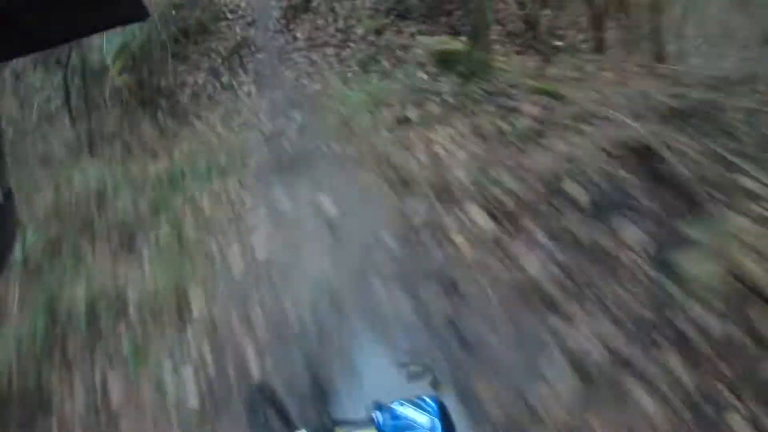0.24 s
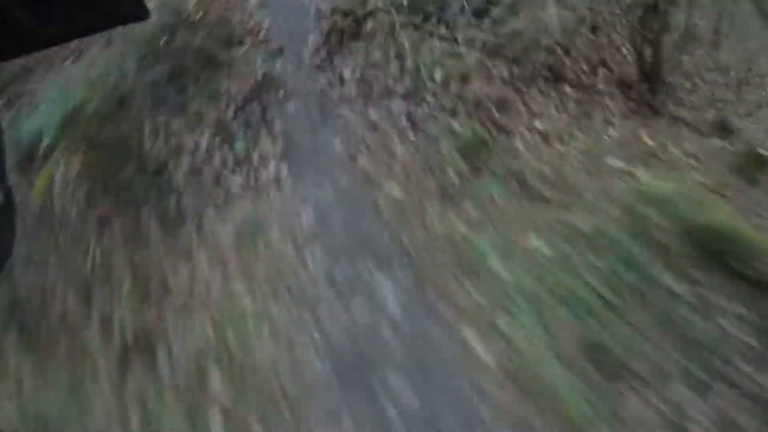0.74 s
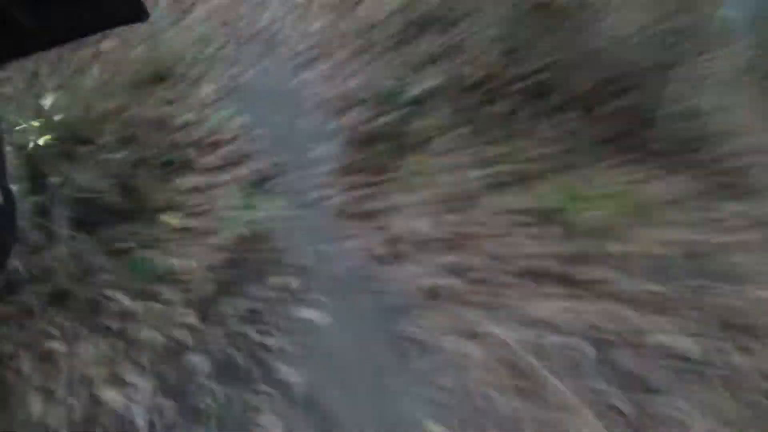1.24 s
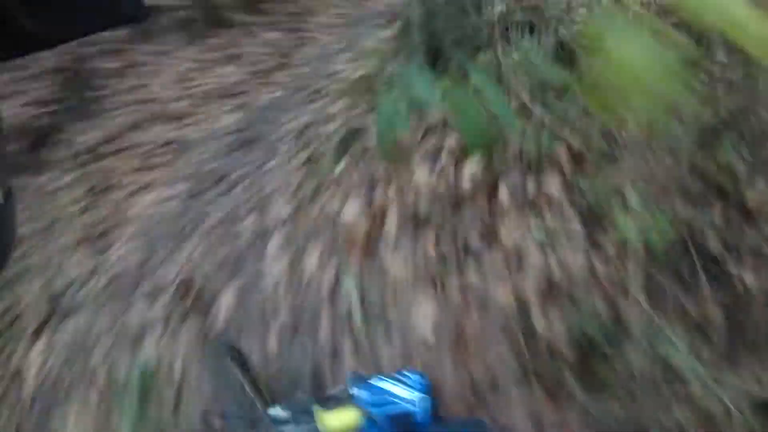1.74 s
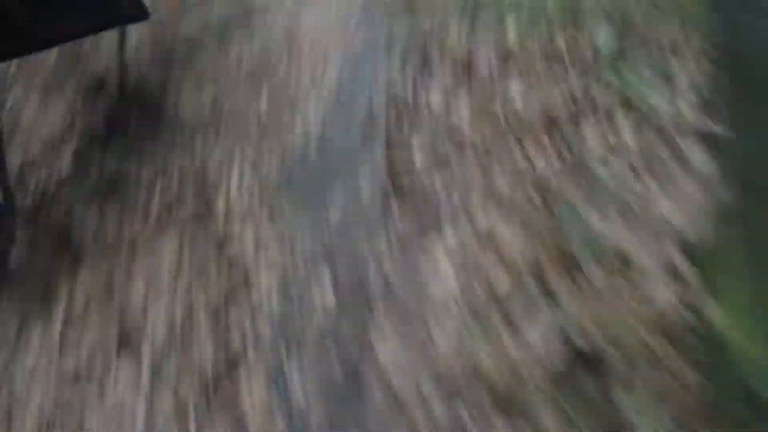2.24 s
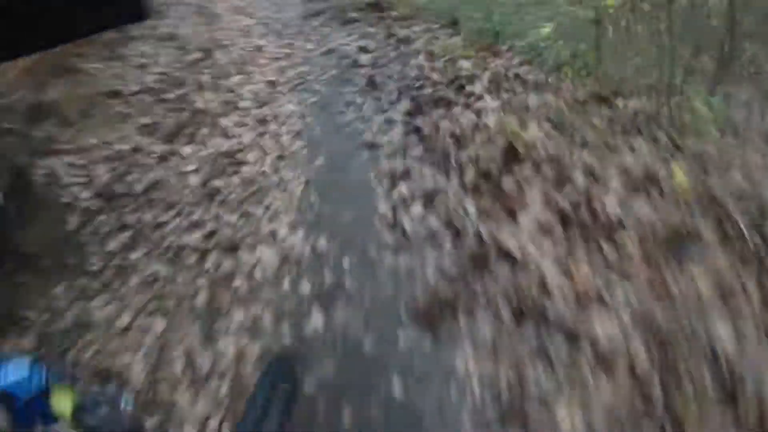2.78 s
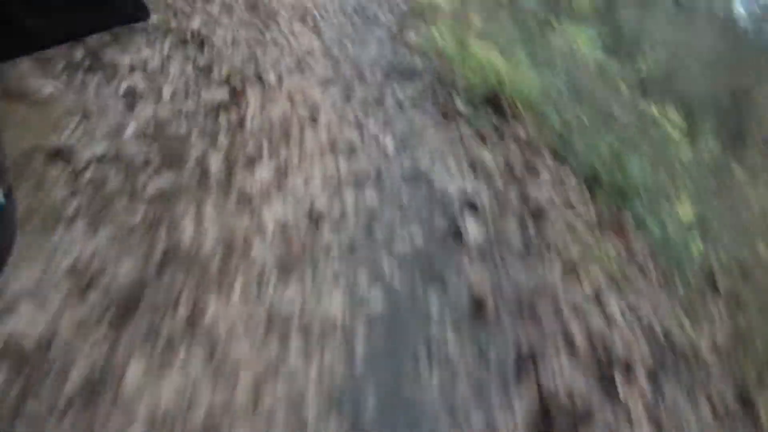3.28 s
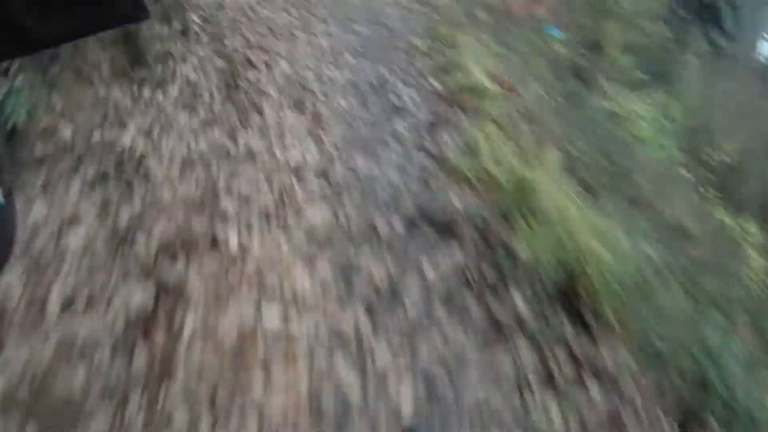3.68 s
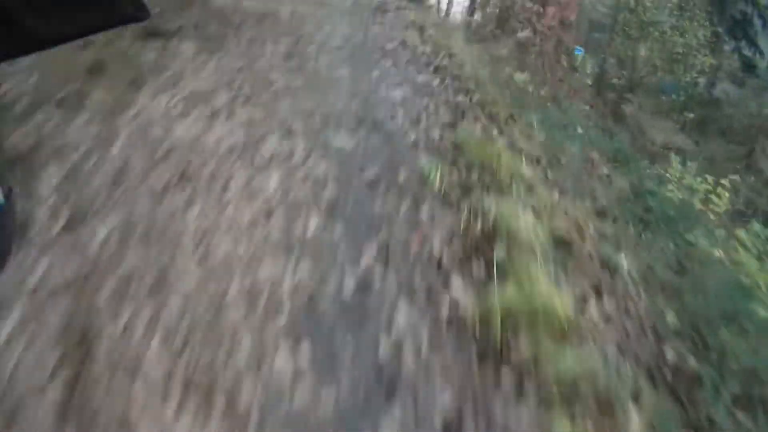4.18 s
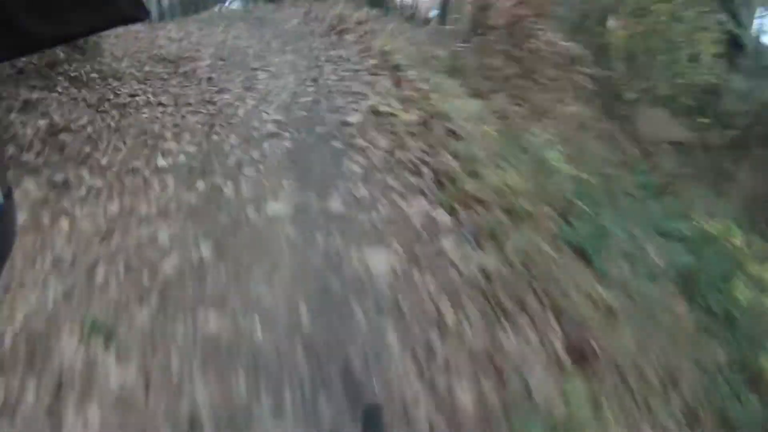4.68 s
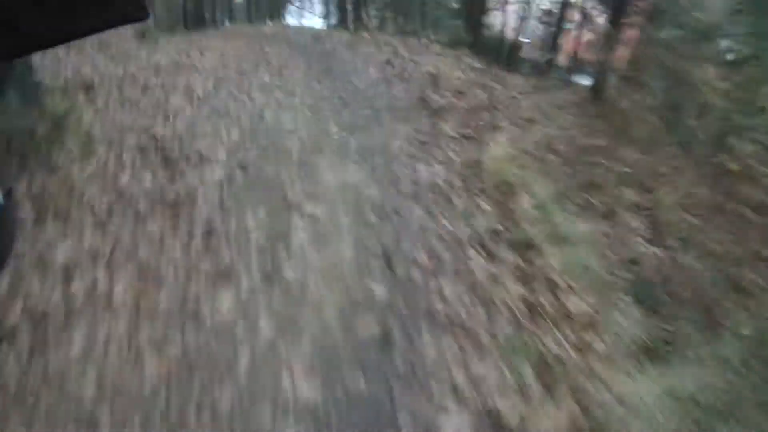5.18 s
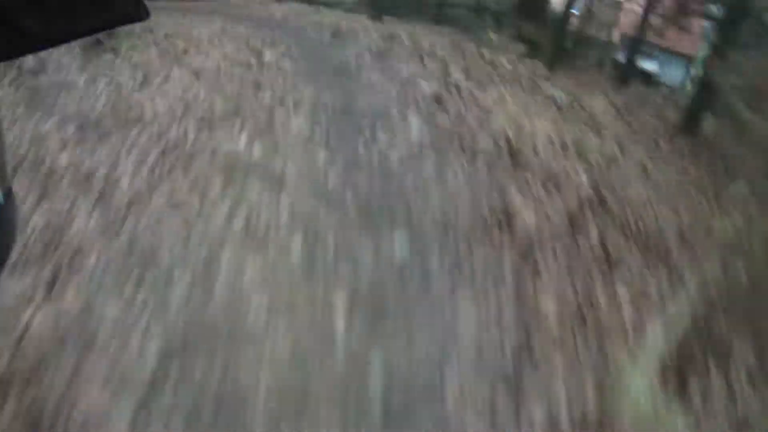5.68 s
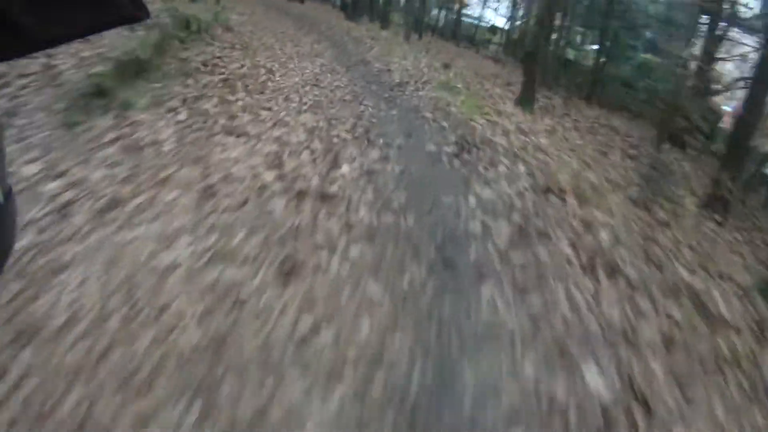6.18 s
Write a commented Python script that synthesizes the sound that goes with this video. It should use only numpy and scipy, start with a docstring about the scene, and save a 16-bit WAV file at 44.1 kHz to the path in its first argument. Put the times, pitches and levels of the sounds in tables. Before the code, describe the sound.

Fast bike ride over dry leaves: low jolts, hollow frame knocks and chain rattle amid popping, buffeting wind that grows into a rough, overloaded roar.

```python
"""Mountain bike on a leafy trail

A mountain bike runs fast down a leaf-covered forest trail, heard from a camera on the rider.
Wind, made of shaped noise and pressure pops, buffets and sputters at the microphone and grows overall.
The tyres hiss through dry leaves as crackling noise; twigs snap as short noise bursts.
The chain rattles through steel resonances, the frame clanks in fading tones, and bumps are low thuds.
The microphone rounds off hard peaks, and the whole sound dips for instants."""
import sys
import numpy as np
from scipy import signal
from scipy.fft import rfft, irfft, next_fast_len
from scipy.io import wavfile
from scipy.ndimage import uniform_filter1d, map_coordinates

SR = 44100
rng = np.random.default_rng(int(sys.argv[2]) if len(sys.argv) > 2 else 0)


def bounce(signal):
    """Save signal as a 16-bit WAV file at the path given by the first command-line argument."""
    frames = np.transpose(np.atleast_2d(signal))
    limited = np.clip(frames, -1, 1)
    pcm = np.round(limited * 32767).astype(np.int16)
    wavfile.write(sys.argv[1], SR, pcm)


N = 283563

# In all tables, levels are starting values: gains and random swings may be added later.
# A decay is the time in which a sound falls by 60 dB.

# Air flow at the microphone: time_s, roar_db, sputter_db
AIR_FLOW = [(0.07, -51.5, -65.5), (0.14, -49.5, -61.5), (0.27, -47.5, -60), (0.32, -44.5, -57),
            (0.68, -46.5, -57.5), (0.76, -43.5, -55), (0.95, -44.5, -57.5), (1.01, -42.5, -56),
            (1.17, -41, -50.5), (1.22, -38, -53), (1.28, -44, -59), (1.35, -42, -53.5), (1.41, -46, -59),
            (1.68, -43, -54.5), (2.06, -46.5, -58.5), (2.3, -55.5, -67.5), (2.44, -54.5, -71),
            (2.6, -53.5, -61), (2.68, -49, -60.5), (2.84, -46.5, -62.5), (3.05, -48.5, -65.5),
            (3.2, -42.5, -61.5), (3.3, -40, -57), (3.47, -38, -56), (3.58, -29.5, -45), (3.65, -34, -42.5),
            (3.76, -36.5, -44), (3.9, -36, -45), (3.97, -36, -49.5), (4.1, -32.5, -45), (4.28, -34, -50.5),
            (4.39, -35, -50), (4.55, -38.5, -47.5), (4.76, -34, -47), (4.82, -38, -49.5), (4.97, -35, -45),
            (5.1, -36, -48.5), (5.21, -40, -51), (5.28, -32.5, -46), (5.61, -35.5, -45), (5.75, -39, -53.5),
            (5.8, -35, -48), (6.02, -38, -48), (6.12, -34.5, -45), (6.4, -33, -44.5)]
# Slow pressure swings at the microphone opening: time_s, level_db
PRESSURE_SWINGS = [(0.1, -52), (1.5, -56.5), (1.62, -47), (1.85, -53.5), (2.3, -57.5), (2.8, -57),
                   (3.3, -47), (3.6, -53), (3.85, -53), (4.5, -48), (5.2, -47), (5.35, -42.5), (5.65, -46),
                   (6.0, -49), (6.4, -63)]
# Head-on gusts: start_s, length_s, extra_tearing_db, extra_whistle_db, roar_thinning_db
HEAD_ON_GUSTS = [(0.83, 0.39, 7, 5, 10), (3.612, 0.34, 9.5, 9.5, 2.5), (4.345, 0.12, 10, 5, 8),
                 (5.9, 0.31, 5, 8, 3.5), (6.225, .35, 11, 13, 0.5)]
# Hardest pops in the wind: start_s, kick_db, sputter_db, sputter_length_s
WIND_POPS = [(0.26, -50, -47.5, 0.0029), (0.305, -37.5, -50, 0.018), (.326, -43, -55, .004),
             (0.384, -35, -56, .007), (.46, -41, -49, 0.0044), (.477, -36, -50.5, 0.005),
             (.587, -35.5, -51, .003), (.617, -39, -47.5, 0.0033), (.513, -51, -54, .002),
             (.66, -43, -51, .003), (.744, -37, -47, 0.0046), (1.204, -34, -58, 0.004),
             (1.361, -38, -59, 0.0056), (1.477, -35, -68, 0.0056), (1.575, -39, -43.5, 0.0034),
             (1.604, -36, -50, 0.0069), (1.675, -38, -50, .004), (1.686, -37, -50, .016),
             (1.705, -47, -48, .003), (1.717, -38, -46, .003), (1.746, -43, -50, .005),
             (1.756, -41, -49, 0.0016), (1.778, -44, -50, .004), (1.855, -50, -43, 0.0023),
             (1.997, -34.5, -46.5, 0.004), (2.668, -46, -57, .014), (2.718, -39, -52, .002),
             (2.805, -36.5, -60, .002), (2.838, -42, -60, .004), (2.877, -38.5, -64, .005),
             (3.008, -37, -55, 0.0036), (3.07, -39.5, -48, 0.0022), (3.105, -37, -59, 0.018),
             (3.143, -36, -67, .004), (3.16, -37, -62, .006), (3.284, -35, -51.5, 0.0126),
             (3.41, -43, -49.5, 0.0054), (3.428, -33.5, -49, .004), (3.484, -32, -53, 0.012),
             (3.509, -29, -50, 0.0037), (3.648, -22.5, -40, 0.011), (3.903, -29, -43, 0.011),
             (4.361, -28, -43, 0.0045), (4.375, -27, -39, .009), (4.49, -39, -35.5, 0.0024),
             (4.52, -34, -42, 0.0033), (4.7, -31, -44, 0.0092), (4.735, -36, -40, 0.0038),
             (4.851, -30, -38, 0.004), (4.864, -36, -38.5, 0.0092), (4.889, -31, -37.5, 0.0051),
             (4.962, -30, -41, .003), (4.977, -29, -43, 0.0072), (5, -37, -44, 0.0027),
             (5.036, -31, -50, .003), (5.074, -31, -42, 0.0044), (5.122, -33, -46, 0.0034),
             (5.141, -37, -43, .003), (5.252, -32, -45, .003), (5.272, -35, -42, .003),
             (5.293, -37, -42, 0.0044), (5.452, -34, -44, .008), (5.688, -33, -40, .003),
             (5.785, -31, -41, .003), (5.804, -31, -48, 0.0055), (5.822, -39, -42, .003),
             (5.863, -36, -41, 0.0076), (5.89, -31, -56, 0.0032), (6.055, -31, -43.5, .003),
             (6.338, -35, -38, .004), (6.352, -33, -39, .004)]
# Tyres in the leaves: time_s, level_db
TYRE_LEVELS = [(0.1, -82.5), (0.75, -84), (1.25, -81), (1.5, -73.5), (1.7, -81.5), (1.9, -85), (2.03, -80),
               (2.17, -77), (2.3, -80), (2.46, -71.5), (2.66, -71), (2.78, -78), (2.95, -78), (3.15, -83),
               (3.45, -73.5), (3.59, -74.5), (3.85, -73.5), (4.05, -69), (4.45, -71), (4.63, -72),
               (4.75, -77.5), (5.29, -74.5), (5.73, -79), (6.06, -77), (6.25, -71.5), (6.4, -76)]
# Bumps that jolt the camera, and the low thud of the twig that cracks at 2.592 s: start_s, level_db, pitch_hz,
# decay_s
CAMERA_JOLTS = [(0.0268, -14.5, 190, 0.0051), (0.0386, -22, 233, 0.0094), (0.038, -34, 81.4, 0.082),
                (1.557, -25.5, 61, 0.079), (1.57, -19, 171, 0.022), (2.592, -27, 200, 0.0053),
                (2.849, -31, 80, 0.054), (5.845, -33, 76.4, 0.11)]
# Chain slaps on its guide: start_s, level_db, length_s, low_ring_weight_db, jingle_db (against the slap)
CHAIN_SLAPS = [(0.285, -73, .02, -8, -15), (0.457, -67, 0.012, -15, -15), (0.814, -60.5, 0.0041, 1, -4),
               (0.883, -71, 0.02, -3, -15), (0.902, -66, .003, -3, -15), (0.961, -69, 0.026, -6, -15),
               (1.038, -67, 0.006, 0, -10), (1.056, -68, .005, 0, -12), (1.332, -71, .012, -8, -15),
               (1.96, -70, 0.018, -12, -12), (2.1, -53, 0.007, -18, -17), (2.18, -72, .012, 1, -8),
               (2.544, -67, .012, -5, -12), (2.664, -64.5, 0.018, -5, -15), (3.861, -62, .007, 0, -15),
               (4.087, -62.5, 0.006, -4, -12), (4.9365, -53.5, 0.003, -8, -15),
               (5.045, -62.5, 0.015, -9, -12), (6.184, -64.5, 0.008, 1, -12), (6.222, -71.5, 0.052, 4, -12)]
# Hard knocks through the frame: start_s, ring_db, crunch_db, ring_share (of the free decay),
# tilt_db (per octave), top_pitch_hz (highest pitch that the contact excites)
FRAME_KNOCKS = [(0.432, -47, -51, .5, 0, 4000), (0.537, -53, -48.5, .5, 6, 4000),
                (0.8116, -43, -46, 1, -17, 2600), (1.029, -52, -55, .5, 5, 4000),
                (1.056, -41.5, -54, 0.85, 5, 2600), (1.549, -46, -43.5, 0.79, -3, 2400),
                (2.545, -41, -50, 0.92, 2, 1900), (4.941, -42, -45, 0.6, 2, 2600)]
# Twigs snapping under the tyre: start_s, level_db
TWIG_SNAPS = [(1.6964, -66), (1.8, -66), (1.973, -61), (2.157, -64), (2.5912, -51.5), (4.066, -57),
              (4.101, -56), (4.488, -56), (4.816, -62)]
# Short dips of the whole sound: start_s, length_s, depth_db
SOUND_DIPS = [(0.029, 0.0096, -15.5), (0.046, 0.003, -32), (0.919, 0.0013, -20), (1.1964, 0.007, -17),
              (1.571, 0.0049, -17)]

# Resonances of the drive train's steel: pitch_hz, width_hz, level_db
STEEL_RESONANCES = [(3800, 600, 2.5), (5100, 1300, -2), (6840, 1140, -2), (9900, 1400, -6.5),
                    (11600, 920, -9), (13100, 1200, -22)]
# Free ring of the bike frame: pitch_hz, level_db, decay_s
FRAME_MODES = [(1070, -16, 0.03), (1215, 1.5, 0.068), (1713, -2.5, 0.049), (1820, -6, .045),
               (2020, -1, 0.049)]
# Peaks and notches from cavities of the camera housing: pitch_hz, width_hz, level_db
HOUSING_RESONANCES = [(2000, 58, 2), (2300, 64, -1), (2464, 87, 2), (3640, 240, 2), (3900, 300, 1),
                      (4640, 180, -3.5), (5500, 140, -2.5), (6500, 460, 1), (8130, 350, -4),
                      (9570, 410, 1.5)]

# Tone colour of the slow buffeting: pitch_hz, level_db (per Hz)
BUFFET_COLOUR = [(12, -29), (25, -5), (55, 2.5), (100, -0.5), (160, -13.5), (300, -65), (800, -83)]
# Tone colour of the wind roar: pitch_hz, level_db (per Hz)
ROAR_COLOUR = [(50, -17), (90, -7), (125, -2.5), (175, 0.5), (260, -1), (350, -3), (510, -4.5),
               (700, -13.5), (1000, -24), (2000, -45), (5000, -105)]
# Tone colour of the small sputtering eddies: pitch_hz, level_db (per Hz)
SPUTTER_COLOUR = [(200, -5.5), (500, 3), (800, 4.5), (1100, 1), (1500, -1.5), (2050, -8), (2500, -16.5),
                  (3200, -28.5), (4500, -39), (9000, -53)]
# Tone colour of air tearing over the housing: pitch_hz, level_db (per Hz)
TEARING_COLOUR = [(1200, -8), (2200, -0.5), (2700, -5), (2950, -3.5), (3300, -9), (3600, -17.5),
                  (4400, -15), (4800, -26), (6000, -38), (12000, -60)]
# Tone colour of the hoarse whistle on an edge: pitch_hz, level_db (per Hz)
WHISTLE_COLOUR = [(2500, -36), (3680, -25), (3850, 3), (3960, 7), (4080, 7), (4220, -8), (4700, -24),
                  (6000, -39)]
# Tone colour of a pressure kick: pitch_hz, gain_db
POP_COLOUR = [(60, -6), (250, 17.5), (550, 18.5), (800, 15), (1500, -3.5), (2200, -26), (3200, -24),
              (5000, -39), (9000, -63)]
# Tone colour of crushed leaves: pitch_hz, level_db (per Hz)
LEAF_COLOUR = [(600, -30), (1400, 4.5), (2200, 11.5), (2900, 0), (4500, 0), (6500, -1.5), (9600, -3),
               (12000, -6.5), (15000, -14.5)]
# Tone colour of the thin hiss of air: pitch_hz, level_db (per Hz)
HISS_COLOUR = [(300, 2), (1500, -9), (3000, 0), (6000, 4.5), (9000, 2), (11000, 0), (15000, -9)]
# Tone colour of crunching grit and loose parts: pitch_hz, level_db (per Hz)
CRUNCH_COLOUR = [(400, -15), (1200, 8), (2100, -1.5), (2800, -6), (4200, -21), (6000, -24), (12000, -40)]
# Tone colour of a breaking twig: pitch_hz, level_db (per Hz)
TWIG_COLOUR = [(400, -6), (800, 3), (1500, -2), (2500, 2), (4000, -1), (6200, 2), (8000, -3), (12000, -7),
               (15000, -23)]

CRUISE_DB = -46.5  # sputter level at cruising speed, where flow_db is zero
# Each pair: level in dB at cruising speed, and change in dB per dB of flow
TEAR_DB, TEAR_GROWS = -68, 0.77
WHISTLE_DB, WHISTLE_GROWS = -83, 0.76
DEPTH_DB, DEPTH_GROWS = 1.5, -0.14  # tilt of the roar towards the bass
GUST_EDGE_S = 0.11  # rise and fall of a gust
GUST_SMOOTHING = 0.058  # share of the graininess lost per dB of extra tearing
EDDY_DB, COUPLING_DB = 4.0, 4.0  # random eddy swing; how strongly the sputter follows the roar
SPURT_SHARE, POP_SHARE = 0.38, 0.11  # strength of the spurts and of the small pops
EDDY_TOP = 1.7  # soft limit on eddy strength
LINK_SWING_DB = 5  # spread of the chain link contacts
RING_SCATTER_DB, RING_ROUGH = 1.5, 0.15  # random spread of the frame tones; their unsteadiness
CRUNCH_DECAY_S = 0.08
OVERLOAD, KNEE = 0.093, 6.6  # pressure where the microphone saturates; hardness of its knee
TOP_HZ = 15300  # nothing is kept from here up


def amp(db):
    """Turn decibels into gain."""
    return 10 ** (np.asarray(db) / 20)


def unit(x):
    """Scale to an rms (average strength) of 1."""
    return x / np.sqrt(np.mean(x ** 2) + 1e-20)


def along(points, hz):
    """Read (pitch, value) points on a log pitch axis."""
    f, v = np.transpose(points)
    return np.interp(np.log(hz + 1), np.log(f + 1), v)


def curves(rows):
    """Draw one curve through each column after the time."""
    times, *columns = np.transpose(rows)
    return [np.interp(np.arange(N) / SR, times, column) for column in columns]


def wobble(rate):
    """Make a smooth random curve with rate knots a second."""
    return map_coordinates(rng.standard_normal(N // 8), [np.arange(N) * rate / SR], mode="wrap")


def filtered(x, response):
    """Multiply each frequency of x by a response."""
    size = next_fast_len(N + SR // 2)
    return irfft(rfft(x, size) * response(np.fft.rfftfreq(size, 1 / SR)), size)[..., :N]


def coloured(x, spectrum):
    """Give x a tone colour, at rms 1."""
    return unit(filtered(x, lambda hz: amp(along(spectrum, hz))))


def impulses(rate, spread_db):
    """Make random clicks of scattered size and sign, about rate a second, at rms 1."""
    hit = rng.random(N) < rate / SR
    sizes = amp(spread_db * np.clip(rng.standard_normal(N), -2, 2))
    return unit(hit * rng.choice([-1, 1], N) * sizes)


def spurts(rate, decay_s):
    """Make random swells that start at once and die quickly, at rms 1."""
    fade = amp(-60 * np.arange(SR // 8) / SR / decay_s)
    return unit(signal.fftconvolve(np.abs(impulses(rate, spread_db=4.0)), fade)[:N])


def gritty(envelope, spectrum, rough_db, rate):
    """Shape rough noise in time, then colour it so that sudden starts stay soft."""
    noise = amp(rough_db * wobble(rate)) * rng.standard_normal(N)
    layers = np.array([envelope * noise, noise])
    burst, steady = filtered(layers, lambda hz: amp(along(spectrum, hz)))
    # the unshaped noise sets the level scale
    return burst / np.std(steady)


def add(track, s, sound):
    """Mix a sound into the track at time s."""
    start = max(round(s * SR), 0)
    part = track[start:start + len(sound)]
    part += sound[:len(part)]


def head_on_gusts():
    """Head-on gusts rise and fall: curves of extra tearing, extra whistle and roar thinning, in dB."""
    t = np.arange(N) / SR
    shapes = []
    for s, length, *_ in HEAD_ON_GUSTS:
        inside_s = np.minimum(t - s, s + length - t)
        shapes.append(np.clip(0.5 + inside_s / GUST_EDGE_S, 0, 1))
    _, _, *effects_db = np.transpose(HEAD_ON_GUSTS)
    return [db @ np.array(shapes) for db in effects_db]


def buffeting(swing_db=1.9, swing_rate=9):
    """Slow pressure swings rumble on the microphone opening."""
    level_db, = curves(PRESSURE_SWINGS)
    rumble = coloured(rng.standard_normal(N), BUFFET_COLOUR)
    return amp(level_db + swing_db * wobble(swing_rate)) * rumble


def tearing(flow_db, bursts, rasp_db=6.0):
    """Fast air rips over the housing and sings hoarsely on an edge, with extra force in a head-on gust."""
    extra_db, sing_db, _ = head_on_gusts()
    tear = coloured(bursts * rng.standard_normal(N), TEARING_COLOUR)
    rasp = amp(rasp_db * wobble(180)) * rng.standard_normal(N)
    whistle = coloured(rasp, WHISTLE_COLOUR)
    tear_level = amp(TEAR_DB + TEAR_GROWS * flow_db + extra_db)
    whistle_level = amp(WHISTLE_DB + WHISTLE_GROWS * flow_db + sing_db)
    return tear_level * tear + whistle_level * whistle


def wind(flutter_db=0.89, sway_db=0.27, sway_rate=11, eddy_rate=260, pop_rate=450,
         spurt_rate=60, spurt_decay_s=0.11, split_hz=260, roar_gain_db=0.24, sputter_gain_db=0.92):
    """Slow eddies buffet and roar at the microphone; small ones sputter on the pressure peaks."""
    roar_db, sputter_db = curves(AIR_FLOW)
    flow_db = sputter_db - CRUISE_DB
    extra_db, _, thin_db = head_on_gusts()
    flutter = flutter_db * wobble(45) + sway_db * wobble(sway_rate)
    # in a head-on gust the eddies crowd together into an even rush
    grain = np.clip(1 - GUST_SMOOTHING * extra_db, 0, 1)
    # a breaking eddy pops in the roar and in the sputter at once
    pops = POP_SHARE * grain * impulses(pop_rate, spread_db=6.0)
    roar = coloured(rng.standard_normal(N) + 2.0 * pops, ROAR_COLOUR)
    eddy_db = EDDY_DB * wobble(eddy_rate) + COUPLING_DB * np.clip(roar, -2, 2)
    bursts = amp(flutter + grain * eddy_db)
    # the small eddies come in short spurts
    bursts = bursts * (1 + SPURT_SHARE * grain * spurts(spurt_rate, spurt_decay_s))
    # even out the slower changes in strength
    bursts = bursts / np.sqrt(uniform_filter1d(bursts ** 2, size=SR // 12))
    # no eddy grows far beyond its neighbours
    bursts = unit(np.tanh(bursts / EDDY_TOP))
    sputter = coloured(bursts * rng.standard_normal(N) + pops, SPUTTER_COLOUR)
    sputter = amp(sputter_db + sputter_gain_db + flutter) * sputter
    # slow flow makes large eddies, which tilt the roar to the bass
    depth_db = DEPTH_DB + DEPTH_GROWS * flow_db - thin_db
    deep = filtered(roar, lambda hz: 1 / (1 + (hz / split_hz) ** 4))
    roar = amp(depth_db / 2) * deep + amp(-depth_db / 2) * (roar - deep)
    roar = amp(roar_db + roar_gain_db + flutter) * roar
    return buffeting() + roar + sputter + tearing(flow_db, bursts)


def air(hiss_db=-82.0, follow=0.046):
    """Passing air gives a thin, wide hiss that rises a little with the roar."""
    roar_db, _ = curves(AIR_FLOW)
    level_db = hiss_db + follow * (roar_db - roar_db.mean())
    # separate noise for left and right makes it wide
    return amp(level_db) * coloured(rng.standard_normal((2, N)), HISS_COLOUR)


def tyres(gain_db=5.5, crackle=0.61, crackle_rate=900, knob_db=1.5, patch_db=0.0, patch_rate=9,
          snap=0.23, snap_rate=26, snap_decay_s=0.037):
    """The tread crushes dry leaves: a fine hiss with small crackles and the odd snapping stalk."""
    level_db, = curves(TYRE_LEVELS)
    crush = rng.standard_normal(N) + crackle * impulses(crackle_rate, spread_db=5.5)
    snaps = snap * spurts(snap_rate, snap_decay_s) * rng.standard_normal(N)
    swing_db = knob_db * wobble(49) + patch_db * wobble(patch_rate)
    return amp(level_db + gain_db + swing_db) * coloured(crush + snaps, LEAF_COLOUR)


def jolts():
    """A bump gives the camera a low, quickly damped push; the cracking twig at 2.592 s gives a like thud."""
    t, out = np.arange(SR // 4) / SR, np.zeros(N)
    for s, db, hz, decay_s in CAMERA_JOLTS:
        add(out, s, -amp(db - 60 * t / decay_s) * np.sin(2 * np.pi * hz * t))
    return out


def wind_pops(gain_db=20.0, fizz_decay_s=0.0073, rough_db=1.5, kick_s=0.001145, kick=0.33,
              rebound=0.35, rebound_s=0.001233):
    """A large eddy breaks on the opening: a pressure kick, its rebound and a short run of rough sputter."""
    t, kicks, runs = np.arange(SR // 15) / SR, np.zeros(N), np.zeros(N)
    for s, kick_db, sputter_db, length in WIND_POPS:
        size = amp(kick_db + gain_db)
        # the sputter holds for its length, then fades
        add(runs, s, amp(sputter_db - 60 * np.maximum(t - length, 0) / fizz_decay_s))
        add(kicks, s + kick_s, [-size * kick])
        add(kicks, s + kick_s + rebound_s, [size * rebound])
    sputter = gritty(runs, SPUTTER_COLOUR, rough_db, rate=600)
    return sputter + filtered(kicks, lambda hz: amp(along(POP_COLOUR, hz)))


def chain(attack_s=0.001, fade_decay_s=0.04, jingle_decay_s=0.23, split_hz=5500):
    """Each slap is a short run of link contacts that rings the steel and dies in a faint jingle."""
    t, contacts = np.arange(SR // 4) / SR, np.zeros((2, N))
    for s, db, length, weight_db, jingle_db in CHAIN_SLAPS:
        slap = amp(db - 60 * np.maximum(t - length, 0) / fade_decay_s)
        slap = slap + amp(db + jingle_db - 60 * t / jingle_decay_s)
        slap = slap * (1 - np.exp(-t / attack_s))
        add(contacts[0], s, slap * amp(weight_db))
        add(contacts[1], s, slap)
    links = unit(amp(LINK_SWING_DB * np.tanh(wobble(700))) * rng.standard_normal(N))

    def steel(f):
        """Add up the resonances, with alternating signs."""
        total = 0
        for k, (centre, width, db) in enumerate(STEEL_RESONANCES):
            damping = 1j * f * width
            total = total + (-1) ** k * amp(db) * damping / (centre * centre - f * f + damping)
        return total

    def low_and_high(f):
        """Split the ring in two: the low part carries the weight of each slap."""
        low = 1 / (1 + (f / split_hz) ** 6)
        return np.array([low, 1 - low])

    ringing = filtered(contacts * links, lambda f: steel(f) * low_and_high(f))
    return amp(6) * ringing.sum(axis=0)


def frame(attack_s=0.0017, grit_db=5.5, dull_hz=3200):
    """Each padded knock rings the frame with its own colour and damping, in a crunch of grit and loose parts."""
    t, rings, crunches = np.arange(SR // 4) / SR, np.zeros(N), np.zeros(N)
    rise = 1 - np.exp(-t / attack_s)
    for s, ring_db, crunch_db, share, tilt_db, top_hz in FRAME_KNOCKS:
        ring = np.zeros(len(t))
        for hz, mode_db, decay_s in FRAME_MODES:
            # the tilt pivots on the second tone of the frame
            start_db = mode_db + tilt_db * np.log2(hz / FRAME_MODES[1][0])
            start_db += RING_SCATTER_DB * rng.uniform(-1, 1)
            tone = np.sin(2 * np.pi * (hz * t + rng.random()))
            ring += amp(start_db - 60 * t / (share * decay_s)) * tone / (1 + (hz / top_hz) ** 20)
        add(rings, s, amp(ring_db) * ring * rise)
        add(crunches, s, amp(crunch_db - 60 * t / CRUNCH_DECAY_S) * rise)
    grit = gritty(crunches, CRUNCH_COLOUR, grit_db, rate=500)
    rough_rings = rings * (1 + RING_ROUGH * wobble(550))
    # soften the treble of the ring
    return grit + filtered(rough_rings, lambda hz: 1 / (1 + 1.4j * hz / dull_hz - (hz / dull_hz) ** 2))


def twigs(crack_decay_s=0.011, tail_db=-17, tail_decay_s=0.04):
    """A dry twig breaks: one sharp crack and a faint splintering."""
    t, cracks = np.arange(SR // 10) / SR, np.zeros(N)
    for s, db in TWIG_SNAPS:
        crack = amp(db - 60 * t / crack_decay_s)
        splintering = amp(db + tail_db - 60 * t / tail_decay_s)
        add(cracks, s, crack + splintering)
    return cracks * coloured(rng.standard_normal(N), TWIG_COLOUR)


def housing(hz):
    """Cavities of the camera housing strengthen some pitches and weaken others."""
    return amp(sum(db * np.exp(-((hz - centre) / width) ** 2) for centre, width, db in HOUSING_RESONANCES))


def scene():
    """Bike and wind pass through the housing and sit in the middle; the air hiss spreads wide."""
    bike = tyres() + jolts() + chain() + frame() + twigs()
    return filtered(wind() + wind_pops() + bike, housing) + air()


def record(dry):
    """The microphone rounds off the hardest peaks, the level dips for instants and the top treble is cut."""
    t, gate = np.arange(N) / SR, np.ones(N)
    for s, length, depth_db in SOUND_DIPS:
        gate[(t > s) & (t < s + length)] = amp(depth_db)
    rounded = dry / (1 + np.abs(dry / OVERLOAD) ** KNEE) ** (1 / KNEE)
    # soften the edges of each dip
    dipped = rounded * uniform_filter1d(gate, size=40)
    return filtered(dipped, lambda hz: hz < TOP_HZ)


dry = scene()
out = record(dry)
bounce(out)
```